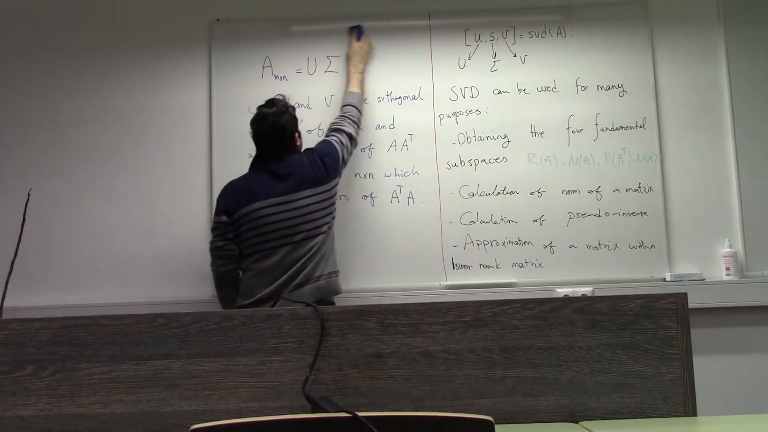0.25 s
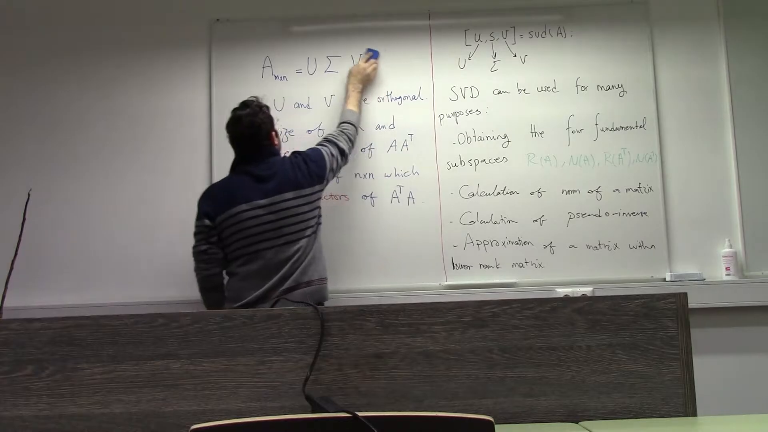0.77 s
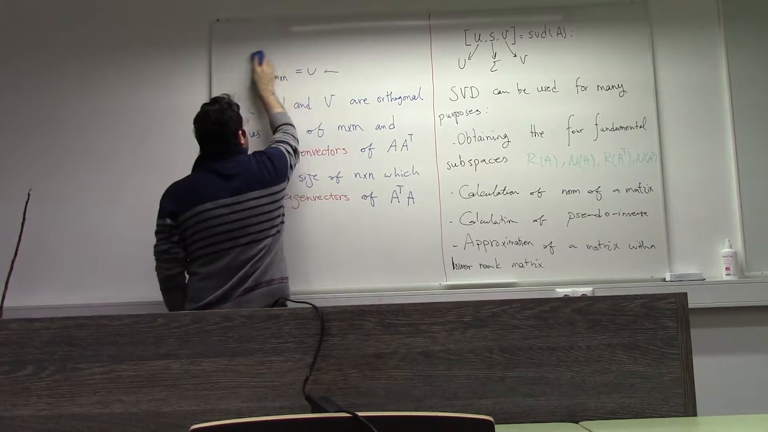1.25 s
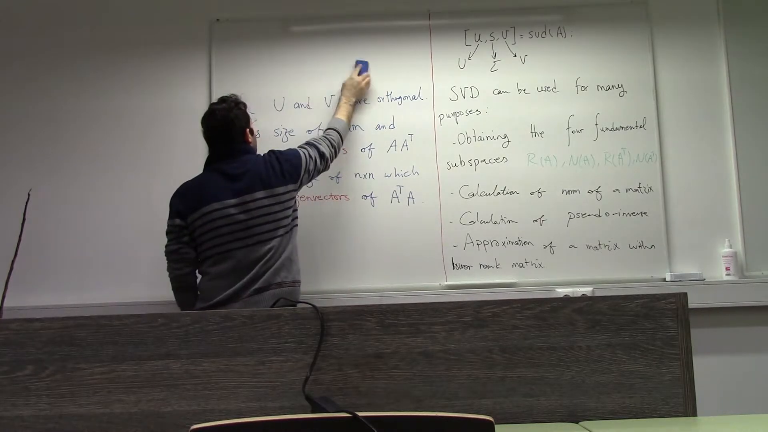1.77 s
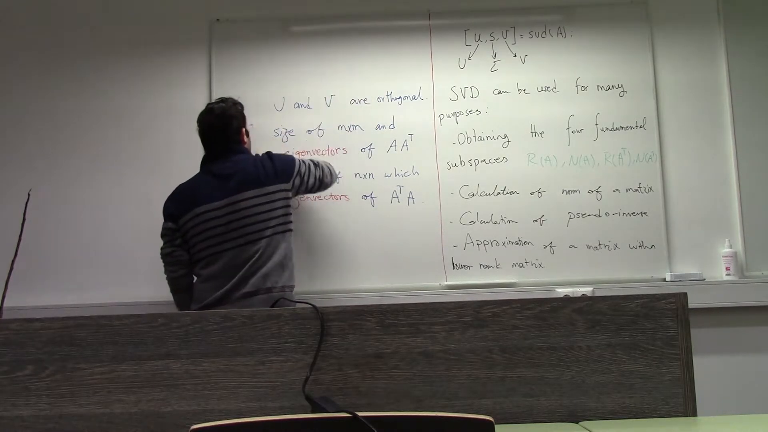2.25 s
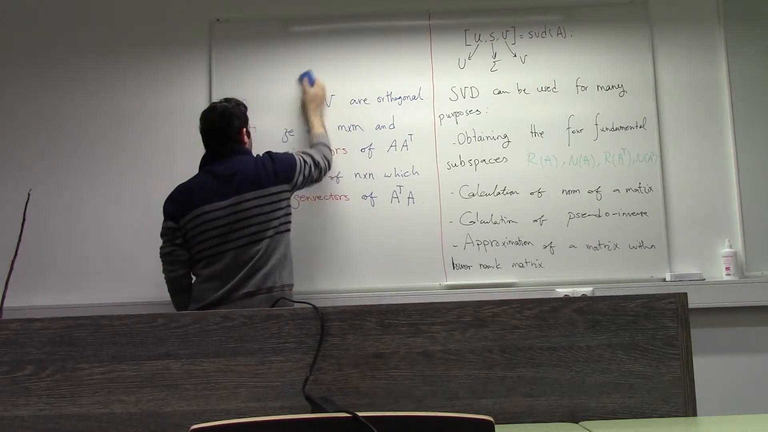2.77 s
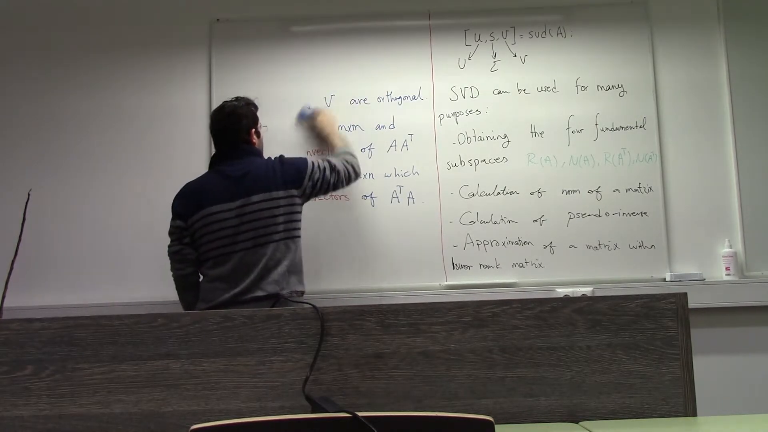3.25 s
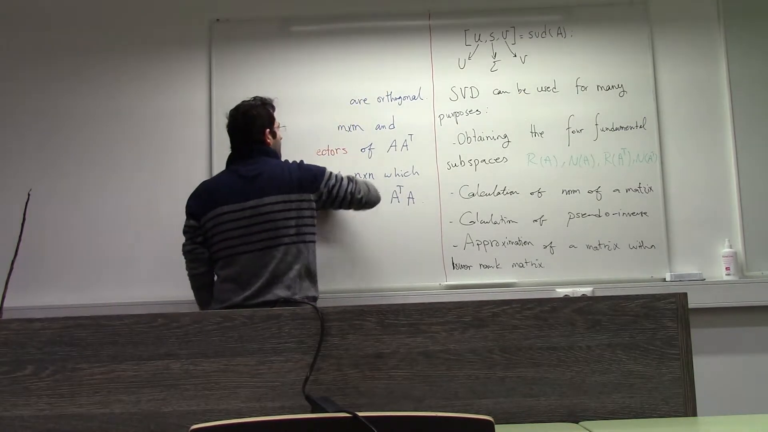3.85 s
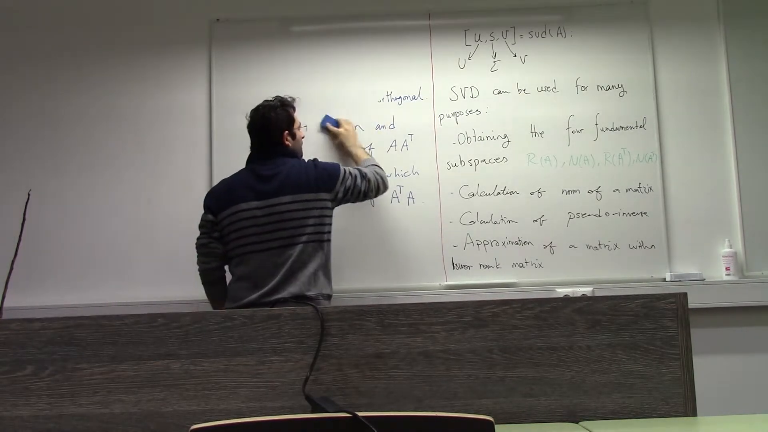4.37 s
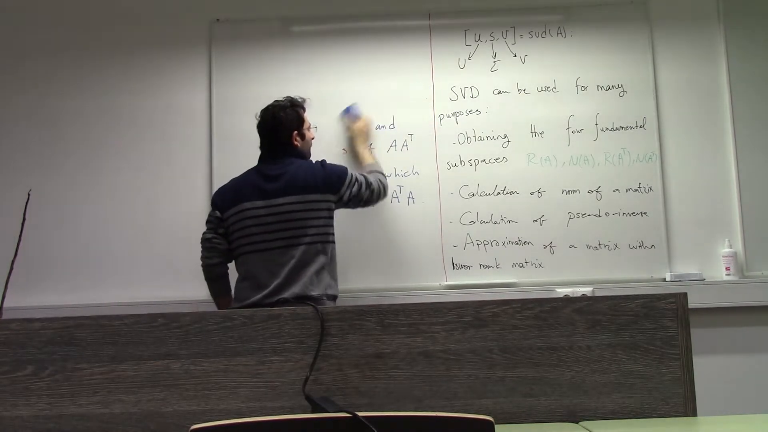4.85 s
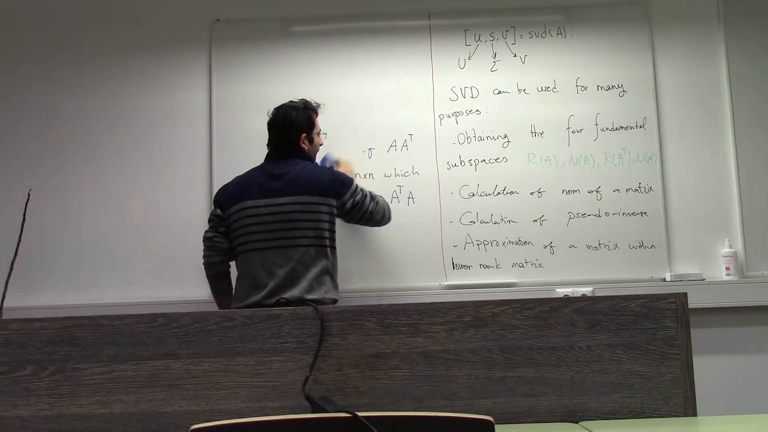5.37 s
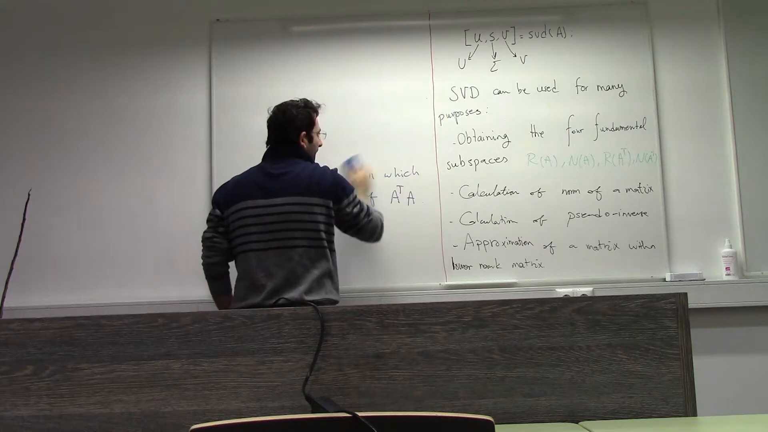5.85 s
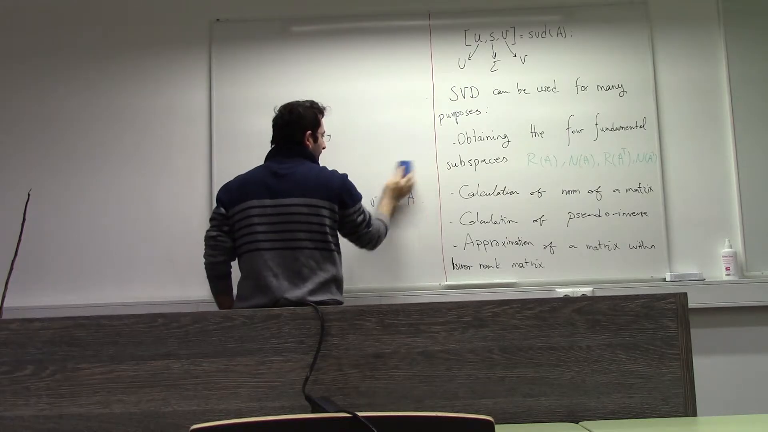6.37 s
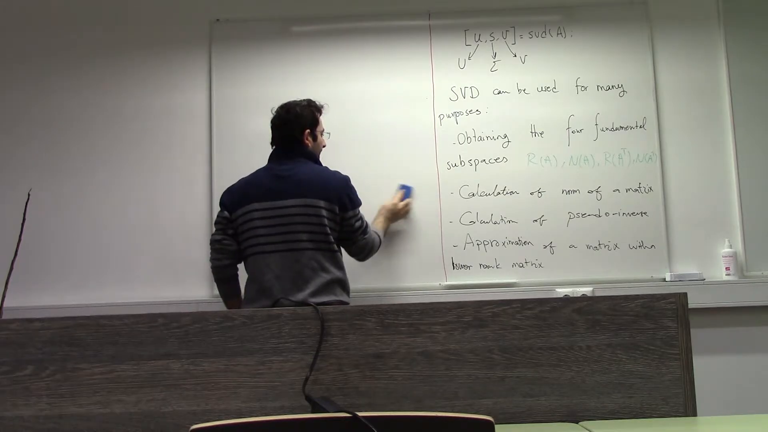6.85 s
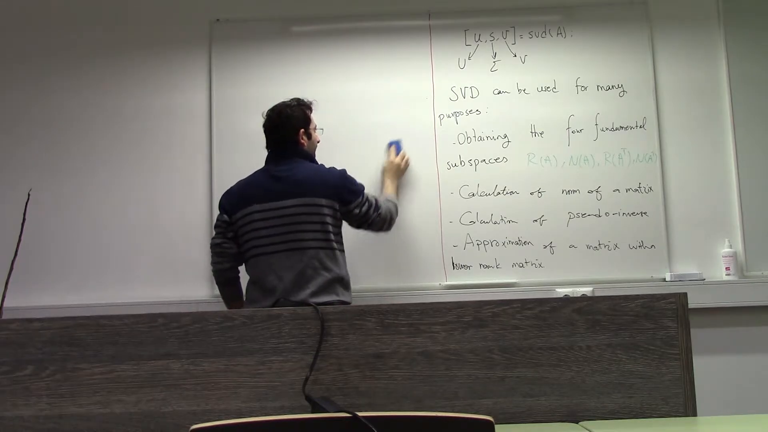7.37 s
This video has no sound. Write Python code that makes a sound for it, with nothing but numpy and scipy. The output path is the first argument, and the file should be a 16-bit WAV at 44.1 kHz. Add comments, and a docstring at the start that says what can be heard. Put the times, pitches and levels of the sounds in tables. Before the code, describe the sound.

A felt eraser hisses back and forth across a whiteboard over steady ventilation, with one sharp click near the end.

```python
"""Wiping a whiteboard

A felt eraser goes to and fro a few metres away in a quiet, ventilated classroom. Sliding friction
makes each stroke hiss, the holder ticks on the board, and the panel's low modes boom softly when it
is leaned on. Close by, something slides with a soft rustle and gives one sharp click.
Air rushes through ducts behind it all, with a hum of fans and mains."""
import sys
import numpy as np
from scipy import signal
from scipy.fft import rfft, irfft, next_fast_len
from scipy.io import wavfile
from scipy.ndimage import uniform_filter1d, map_coordinates

SR = 44100
rng = np.random.default_rng(int(sys.argv[2]) if len(sys.argv) > 2 else 0)


def wav_record(signal):
    """Record a signal, one row per channel, as 16-bit PCM in the file named by sys.argv[1]."""
    frames = np.transpose(np.atleast_2d(signal))
    bounded = np.clip(frames, -1, 1)
    # unit amplitude maps onto the largest positive 16-bit level
    quanta = np.round(bounded * 32767).astype(np.int16)
    wavfile.write(sys.argv[1], SR, quanta)


N = 335447


def eraser(felt_db=.3, fizz_db=3.1, holder_db=.2, uneven_db=0.32):
    """Sliding friction: felt fibres slip and excite the hollow holder; speed adds a finer fizz."""
    # spectra of felt on the glossy board and of its fizz: (f/Hz, relative level/dB)
    felt_spectrum = [(400, -12), (1200, -14), (2200, -8), (2800, -4), (3400, -1.5), (4400, -2.4),
                     (5100, -2.8), (6200, -2.6), (7400, -5.8), (9000, -15), (12000, -20), (16000, -42)]
    fizz_spectrum = [(3000, -24), (6000, 2), (8500, 0.8), (10500, -2.2), (13500, -7.7), (16000, -16)]
    hiss_gain, fizz_gain, ring_gain, centre_hz = strokes()
    felt = amp(felt_db) * hiss_gain * friction(felt_spectrum, snags_per_s=2500, snag_share=0.19)
    fizz = amp(fizz_db) * fizz_gain * friction(fizz_spectrum, snags_per_s=4000, snag_share=.2)
    holder = amp(holder_db) * ring_gain * hollow(centre_hz, width_hz=920)
    rub = narrowed(felt, side_db=-4.5) + narrowed(fizz, side_db=-5.0) + narrowed(holder, side_db=-7)
    return amp(uneven_db * wobble(45)) * patchy(rub, depth_db=.8)


def strokes(end_s=7.68, speed_power=.98, fizz_power=1.24, dulling_db=5.5):
    """Friction noise grows as a power of speed. Gives hiss, fizz and ring gains and holder pitch."""
    # strokes, each lasting until the next: (start t/s, share spent speeding up, level at the turn/dB,
    # level at full speed/dB, fizz offset/dB, ring offset/dB, holder f/Hz)
    wipes = [(-0.365, 0.58, -61.5, -57.5, -12.5, -6.0, 3470.0),
             (0.647, 0.71, -66.5, -57.5, -15.0, -3.5, 3400.0),
             (1.514, 0.74, -67.0, -55.5, -10.0, -7.0, 3220.0),
             (1.867, 0.72, -69.0, -55.0, -12.0, -6.5, 3240.0),
             (2.477, 0.68, -71.5, -55.5, -8.0, -8.5, 3140.0),
             (2.789, 0.6, -69.0, -54.0, -11.0, -10.0, 3110.0),
             (3.143, 0.75, -68.0, -55.5, -7.0, -6.0, 3150.0),
             (3.484, 0.47, -71.0, -54.0, -10.5, -9.0, 3080.0),
             (3.865, 0.72, -68.0, -54.5, -7.5, -10.0, 3020.0),
             (4.218, 0.86, -70.0, -57.0, -10.5, -5.5, 3020.0),
             (4.434, 0.56, -65.5, -56.0, -8.5, -3.5, 3090.0),
             (4.737, 0.73, -69.0, -55.5, -9.0, -5.0, 3090.0),
             (5.045, 0.59, -64.0, -56.0, -6.0, -5.0, 3090.0), (5.253, 0.61, -64.0, -54, -8.5, -5.5, 3180.0),
             (5.52, 0.57, -64.0, -55.0, -7.0, -5.0, 3120.0),
             (5.767, 0.45, -62.0, -56.0, -8.5, -4.5, 3160.0),
             (6.084, 0.68, -65.5, -55.0, -8.5, -8.0, 3160.0),
             (6.381, 0.58, -62.5, -57.5, -10.5, -4.5, 3300.0),
             (6.626, 0.51, -64.0, -57.5, -7.5, -3.0, 3150.0),
             (6.836, 0.61, -68.0, -60.5, -8.0, -3.0, 3260.0),
             (7.009, 0.73, -67.5, -61.0, -9.0, -5.0, 3250.0),
             (7.158, 0.53, -67.5, -56.5, -14.0, -6.0, 3330.0),
             (7.372, 0.33, -64.5, -60.5, -6.0, -6.5, 3270.0)]
    t = np.arange(N) / SR
    hiss, fizz, ring, centre_hz = np.zeros((4, N))
    starts, _, turn_levels, *_ = np.transpose(wipes)
    ends = [*starts[1:], end_s]
    for (start, rise, _, db, fizz_db, ring_db, ring_hz), end in zip(wipes, ends):
        now = (t >= start) & (t < end)
        speed = arch(start, end - start, rise)[now]
        progress = (t[now] - start) / (end - start)
        hiss[now] = amp(db) * speed ** speed_power
        fizz[now] = amp(db + fizz_db - dulling_db * (progress - .5)) * speed ** fizz_power
        ring[now] = amp(db + ring_db) * speed ** speed_power
        centre_hz[now] = ring_hz
    # the hand loops round at a turn, so a little rubbing stays, with weaker fizz and ring
    turn_db = np.interp(t, starts, turn_levels)
    return (linger(np.hypot(hiss, amp(turn_db)), decay_s=.015),
            linger(np.hypot(fizz, amp(turn_db - 8.5)), decay_s=.005),
            linger(np.hypot(ring, amp(turn_db - 7.2)), decay_s=.014),
            centre_hz)


def friction(spectrum, snags_per_s, snag_share):
    """Stick-slip noise: countless tiny slips merge to a hiss, and a few larger snags stand out."""
    snags = (rng.random(N) < snags_per_s / SR) * rng.standard_normal((2, N))
    slips = rng.standard_normal((2, N))
    force = np.sqrt(1 - snag_share) * slips + np.sqrt(snag_share) * unit(snags)
    return unit(filtered(spread(force), lambda hz: amp(along(spectrum, hz))))


def hollow(centre_hz, width_hz):
    """Resonance of the hollow holder: a band of noise whose centre shifts with the grip."""
    baseband = np.array([noise(), noise()])
    in_phase, quadrature = filtered(baseband, lambda hz: 1 / (1 + (2 * hz / width_hz) ** 2))
    phase = 2 * np.pi * np.cumsum(centre_hz) / SR
    return unit(in_phase * np.cos(phase) + quadrature * np.sin(phase))


def patchy(x, depth_db):
    """Spectral modulation: the colour drifts at random as the contact changes."""
    spectra = signal.stft(x, nperseg=512)[2]
    drift = rng.standard_normal(spectra.shape[1:])
    for _ in range(2):
        drift = uniform_filter1d(drift, size=5, axis=0)  # across frequency
        drift = uniform_filter1d(drift, size=24, axis=1)  # across time
    return signal.istft(spectra * amp(depth_db * unit(drift)), nperseg=512)[1][:, :N]


def panel(drag_db=-65):
    """Forced vibration: the eraser drives the board's low modes; where it presses decides which lead."""
    # panel modes: (f/Hz, nominal width/Hz, relative level/dB)
    modes = [(149, 39, -8), (221.5, 63, -1.5), (318, 43, -7.5), (408, 47, -13.5)]
    # the hand leans on the panel: (firmest t/s, length/s, level/dB, tilt/(dB per octave))
    leans = [(.02, .3, -52.5, -0.5), (3.626, .26, -47, 3.5), (3.86, .35, -58, -5), (4.69, 0.15, -46, -6),
             (4.796, 0.15, -49.5, -6), (5.8, .5, -54.5, -2), (7.05, 0.56, -55, -1)]
    presses = [(amp(db) * arch(s - length / 2, length) ** 2, tilt) for s, length, db, tilt in leans]
    out = 0
    for centre, width, db in modes:
        octaves = np.log2(centre / modes[1][0])  # the tilt pivots on the second mode
        push = sum(press * amp(tilt * octaves) for press, tilt in presses)
        out += amp(db) * np.hypot(push, amp(drag_db)) * resonate(noise(), centre, 2 * width)
    return out


def ticks(width_hz=750, wet_db=-7, decay_db_per_cycle=9):
    """Light impacts: a damped oscillation of a few cycles, then a short rattle around the same pitch."""
    # ticks and taps: (t/s, impact level/dB, rattle level/dB, f/Hz, rattle T60/s)
    contacts = [(0.720, -45, -54, 2800, 0.11), (1.046, -42, -49.5, 3280, .15),
                (2.345, -41, -50.5, 1900, .09), (3.207, -39, -53, 1600, .05), (5.8337, -30, -49, 1760, .07),
                (6.086, -40, -55, 1900, .05), (6.194, -40, -52, 1304, 0.1), (7.163, -40, -56, 900, 0.028),
                (7.2023, -33, -45.5, 1750, .06), (7.259, -35, -42, 500, 0.13),
                (7.5684, -38, -52, 750, 0.032)]
    out, t = np.zeros(N), np.arange(N) / SR
    for s, impact_db, rattle_db, centre, t60 in contacts:
        age = np.maximum(t - s, 0)
        cycles = age * centre
        impact = amp(impact_db - decay_db_per_cycle * cycles) * np.sin(2 * np.pi * cycles)
        rattle = resonate(rng.standard_normal(N), centre, width_hz + centre / 4)
        out += impact + amp(rattle_db - 60 * age / t60) * (t >= s) * rattle
    return out + amp(wet_db) * room(out)


def click(at_s=7.3927, gain_db=-13.5, wet_db=-14, low_hz=290, soft_hz=8500, lag_s=1.5e-5):
    """Free vibration: heavily damped modes snap once, and nearby surfaces and the room reflect it."""
    # modes of the clicking body: (f/Hz, relative level/dB, T60/s)
    modes = [(500, -2, 0.0047), (1380, -.5, 0.0037), (1800, -11, .006), (2550, -8.5, 0.0075),
             (4900, -8, 0.0029), (6420, -15.5, 0.0057), (8300, -23, 0.0072), (13400, -20, .005)]
    # early reflections: (delay t/s, relative level/dB)
    reflections = [(.0075, -23), (.0083, -17), (0.0113, -30), (0.022, -26)]
    age = np.maximum(np.arange(N) / SR - at_s, 0)
    snap = -sum(amp(gain_db + db - 60 * age / t60) * np.sin(2 * np.pi * hz * age)
                for hz, db, t60 in modes)
    # a small body radiates no bass, and the contact time rounds off the top
    snap = signal.sosfilt(signal.butter(2, low_hz, "high", fs=SR, output="sos"), snap)
    snap = signal.sosfilt(signal.butter(2, soft_hz, fs=SR, output="sos"), snap)
    direct = np.array([snap, delayed(snap, lag_s)]) * amp([[.3], [-.3]])  # a little to the left
    echoes = sum(amp(db) * delayed(snap, delay) for delay, db in reflections)
    return direct + echoes + amp(wet_db) * room(snap)


def slide(dull_db=-3, bright_db=-2, speed_power=1.3):
    """Sliding friction close by: a soft rustle swells and fades with the speed of each movement."""
    # movements: (fastest t/s, length/s, level/dB, brightness/dB)
    slides = [(4.94, .46, -63.5, -4), (5.45, .54, -61, -2), (5.83, .44, -57, -2), (6.235, .16, -56.5, -12),
              (6.32, .23, -52.3, 8), (6.53, .35, -60, 1), (7.19, .7, -51.2, 2.7), (7.39, .48, -50, 1.2)]
    # spectra of the rustle's dull and bright parts: (f/Hz, relative level/dB)
    dull_spectrum = [(250, -12), (550, -0.5), (750, -4), (1050, -7), (1450, -0.5), (2000, -16), (3000, -13),
                     (8000, -45)]
    bright_spectrum = [(900, -1), (1500, -10.5), (1820, 3), (2080, 2), (2350, 4.5), (2550, 0), (2780, 1),
                       (3100, -6), (3500, -7), (4200, -13), (10000, -23), (16000, -40)]
    moves = [(amp(db) * arch(s - length / 2, length) ** speed_power, tilt)
             for s, length, db, tilt in slides]
    # overlapping movements add in power
    dull_gain = np.linalg.norm([move * amp(dull_db - tilt / 2) for move, tilt in moves], axis=0)
    bright_gain = np.linalg.norm([move * amp(bright_db + tilt / 2) for move, tilt in moves], axis=0)
    dull = dull_gain * friction(dull_spectrum, snags_per_s=500, snag_share=0.32)
    bright = bright_gain * friction(bright_spectrum, snags_per_s=830, snag_share=0.19)
    return dull + bright


def ventilation(air_db=-49.5, waver_db=0.07):
    """Flow noise and duct resonance, with the slightly unsteady tones of fans and mains."""
    # spectrum of the rushing air: (f/Hz, relative level/dB)
    air_spectrum = [(22, -38), (36, -18), (80, -13), (130, -3.5), (200, 0.5), (330, -1.5), (450, -3),
                    (600, -7.5), (720, -12.5), (1500, -17), (3200, -22), (6500, -31), (11000, -40),
                    (16000, -46)]
    # duct resonances: (f/Hz, level/dB, nominal width/Hz)
    duct_modes = [(219.9, -65.5, 7.9), (306.7, -61, 9.2), (603.5, -74.5, 12), (1806, -73.5, 54),
                  (11020, -84, 250)]
    # fan and mains tones: (f/Hz, level/dB, phase wander/rad)
    hum = [(57.5, -69.5, 0.73), (70.7, -71.5, .8), (99.6, -68, 0.17), (111.7, -61, 0.54),
           (247.6, -57.5, 0.38), (498.6, -63, 1), (586.3, -66.5, 0.9), (640, -69.5, 1.15)]
    t = np.arange(N) / SR
    air_gain = amp(air_db + waver_db * wobble(6))
    air = air_gain * unit(filtered(noise(), lambda hz: amp(along(air_spectrum, hz))))
    ducts = sum(amp(db) * resonate(noise(), centre, 2 * width) for centre, db, width in duct_modes)
    tones = sum(amp(db) * unit(np.sin(2 * np.pi * hz * t + wander * wobble(5)))
                for hz, db, wander in hum)
    return (air + ducts + tones) * amp([[-.3], [.3]])  # a little to the right


def room(x):
    """Reverberation: the classroom's diffuse tail decays exponentially, the treble first."""
    # reverberation times: (f/Hz, T60/s)
    decay_times = [(200, 0.44), (2000, 0.36), (6000, 0.3), (14000, 0.24)]
    hz, t, spectra = signal.stft(rng.standard_normal((2, SR // 2)), SR, nperseg=256)
    decay = amp(-60 * t / along(decay_times, hz)[:, None])
    tail = signal.istft(spectra * decay, SR, nperseg=256)[1]
    tail /= np.linalg.norm(tail[0])
    return spread(signal.fftconvolve(x[None], tail, axes=1)[:, :N])


def linger(gain, decay_s):
    """Energy storage: the room holds a sound for a moment, which softens every fall in level."""
    keep = np.exp(-1 / (SR * decay_s))
    energy = signal.lfilter([1 - keep], [1, -keep], gain ** 2, zi=[keep * gain[0] ** 2])[0]
    return np.sqrt(energy)


def spread(pair):
    """Spatial coherence: two unrelated signals become a diffuse field at two nearby points."""
    # likeness of left and right: (f/Hz, coherence)
    coherence = [(30, 1), (70, .96), (200, 0.99), (450, 0.95), (850, 0.8), (1500, 0.88), (2200, 0.83),
                 (3200, 0.91), (4900, 0.78), (7000, 0.85), (14000, 0.78)]

    def mid_side_gains(hz):
        angle = np.arccos(along(coherence, hz)) / 2
        return np.array([np.cos(angle), np.sin(angle)])

    mid, side = filtered(pair, mid_side_gains)
    return np.array([mid + side, mid - side])


def narrowed(pair, side_db):
    """Direct sound from straight ahead is more coherent between left and right than a diffuse field."""
    mid = pair.mean(axis=0)
    return mid + amp(side_db) * (pair - mid)


def noise():
    """Diffuse white noise, two channels."""
    return spread(rng.standard_normal((2, N)))


def arch(start, length, rise=0.49):
    """A smooth movement: from rest to 1 over the share rise of its length, then back to rest."""
    ramp = np.interp(np.arange(N) / SR, [start, start + length * rise, start + length], [0, 1, 0])
    return np.sin(np.pi / 2 * ramp)


def wobble(rate):
    """A smooth random curve, rate knots a second."""
    knots = rng.standard_normal(int(N * rate / SR) + 4)
    return map_coordinates(knots, [np.arange(N) * rate / SR])


def resonate(x, centre, width):
    """Forced response of two like damped resonators in series, scaled to rms 1."""
    return unit(filtered(x, lambda hz: (1j * hz * width / (centre**2 - hz**2 + 1j * hz * width)) ** 2))


def delayed(x, delay_s):
    """Propagation delay: a phase lag proportional to frequency."""
    return filtered(x, lambda hz: np.exp(-2j * np.pi * hz * delay_s))


def filtered(x, response):
    """Linear filtering: the spectrum of x times a frequency response."""
    size = next_fast_len(N + SR // 2)
    hz = np.fft.rfftfreq(size, 1 / SR)
    return irfft(rfft(x, size) * response(hz), size)[..., :N]


def along(points, hz):
    """Interpolate (f/Hz, value) points on a logarithmic frequency axis."""
    f, values = np.transpose(points)
    return np.interp(np.log(hz + 1), np.log(f + 1), values)


def amp(db):
    """Decibels to amplitude ratio."""
    return 10 ** (np.asarray(db) / 20)


def unit(x):
    """Scale to rms 1."""
    return x / np.sqrt(np.mean(x ** 2) + 1e-20)


def scene():
    """Superposition: the pressures of all sources add."""
    return eraser() + panel() + slide() + ticks() + click() + ventilation()


def record(dry):
    """Band limiting: nothing above 15750 Hz passes."""
    return filtered(dry, lambda hz: hz < 15750)


dry = scene()
out = record(dry)
wav_record(out)
```